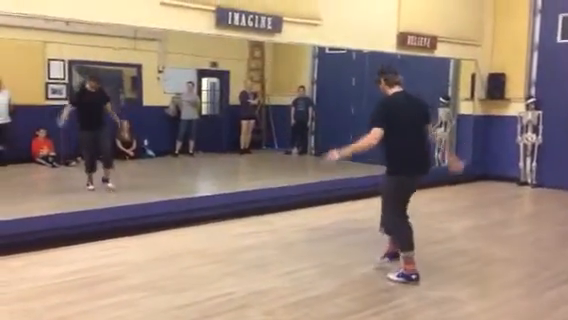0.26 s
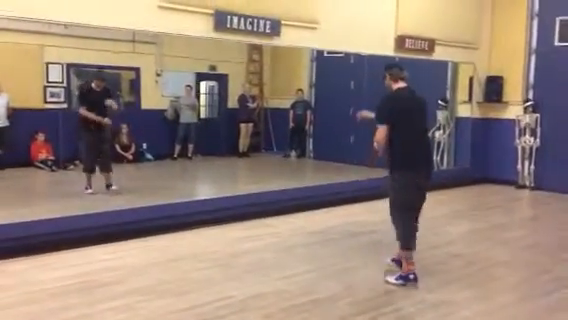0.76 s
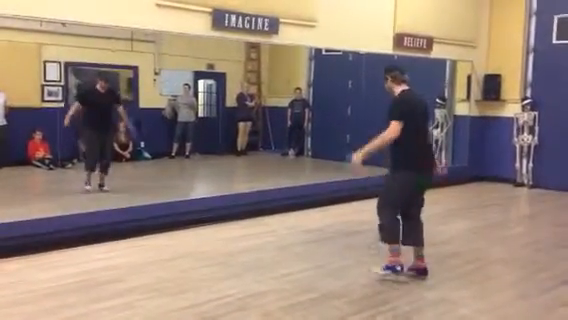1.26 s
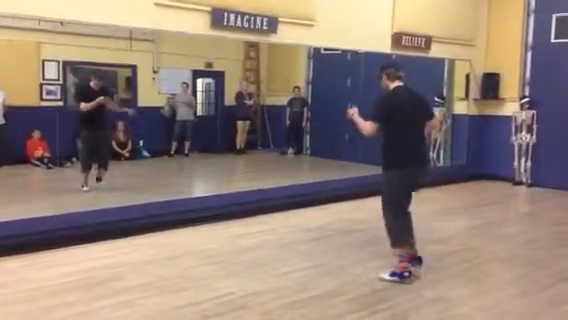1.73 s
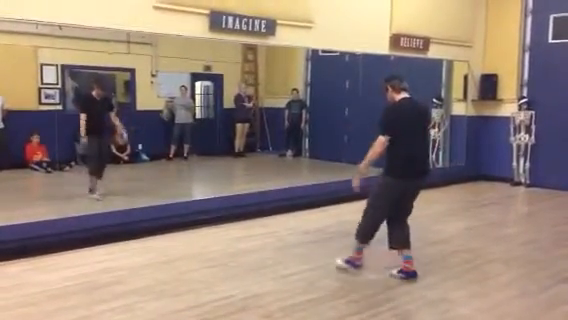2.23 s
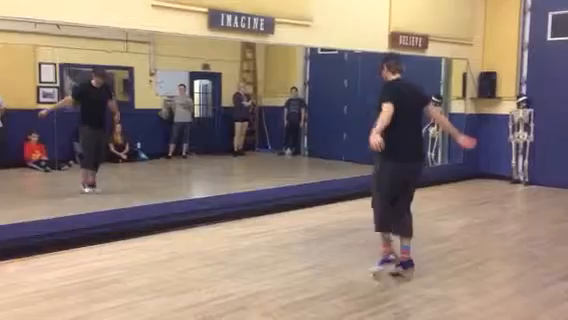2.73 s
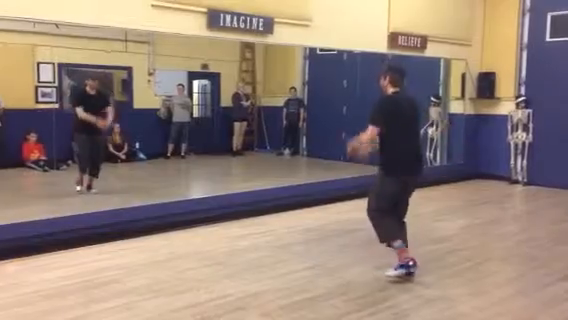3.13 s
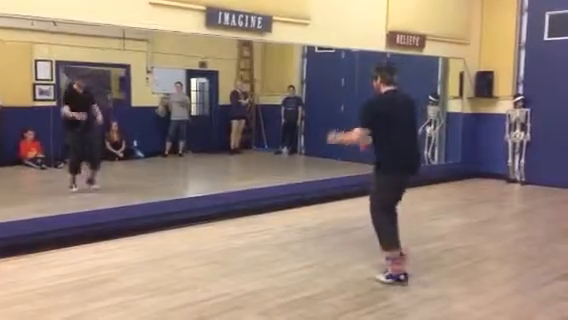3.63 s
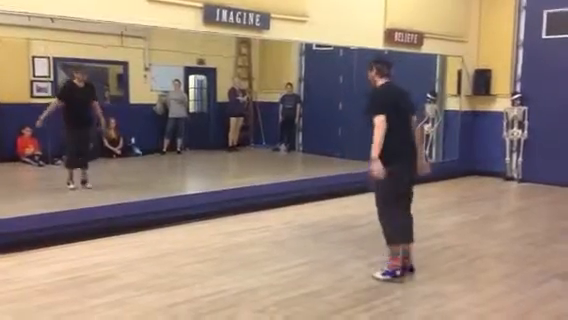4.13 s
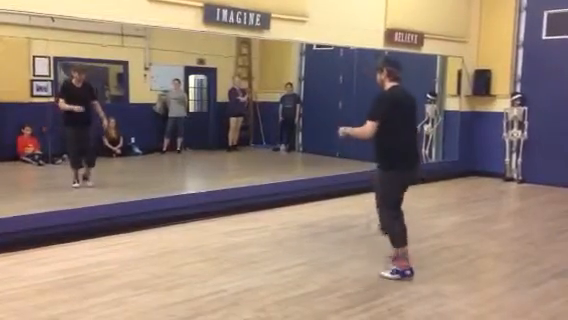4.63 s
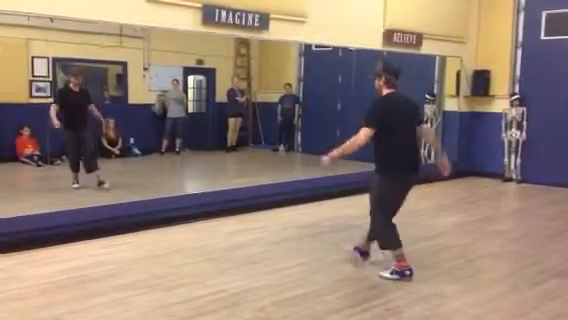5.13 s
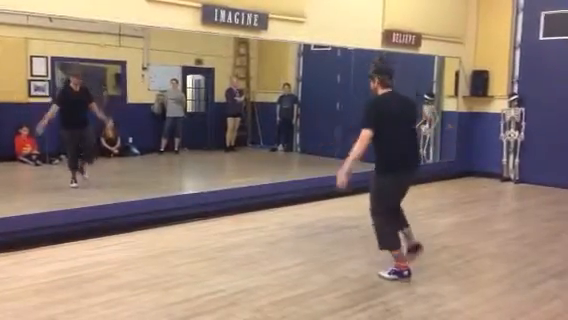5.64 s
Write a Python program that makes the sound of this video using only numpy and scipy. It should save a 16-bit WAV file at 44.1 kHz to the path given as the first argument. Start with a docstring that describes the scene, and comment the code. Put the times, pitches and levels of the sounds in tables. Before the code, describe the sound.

Tap shoes on a sprung wooden floor, heard by one small microphone in a hard-walled hall. The tail of an earlier tap opens, then come a quick pair, spaced loud strikes, a tight little cluster near the middle, and more steady single taps to the end. Sharp early echoes and a diffuse tail follow each blow, over quiet room hiss.

```python
"""Tap dancer in a bare studio

A dancer works through a slow step on a sprung wooden floor in an echoing room, one microphone.
Each blow of a metal plate is a hard click that sets damped sines of plate and boards ringing
for milliseconds; the walls answer with sharp echoes and a tail of filtered noise, each band dying
at its own rate. Under it lies a faint steady hiss of shaped noise."""
import sys
import numpy as np
from scipy import signal
from scipy.fft import rfft, irfft
from scipy.io import wavfile

SR = 44100
rng = np.random.default_rng(int(sys.argv[2]) if len(sys.argv) > 2 else 0)


def store_wav(level_fs):
    """Save 16-bit WAV to argv[1]."""
    pcm = np.round(np.clip(np.atleast_2d(level_fs), -1, 1) * 32767)
    wavfile.write(sys.argv[1], SR, pcm.T.astype(np.int16))


N = 259749
LEAD = SR // 2  # samples kept ahead of the start, for a tap struck earlier
LENGTH = SR  # samples of each tap with its tail
FAVOURED_OCTAVES = 0.21  # width of the pitch region that a blow favours or damps


def from_db(db):
    """Decibels to gain."""
    return 10 ** (np.asarray(db) / 20)


def at_hz(points, hz):
    """Reads an (f/Hz, value) table on a log-frequency axis."""
    table_hz, values = np.transpose(points)
    return np.interp(np.log(hz), np.log(table_hz), values)


def bump(hz, centre_hz, octaves):
    """A bell of height 1 on a log-frequency axis."""
    distance = np.log2(np.maximum(hz, 1) / centre_hz) / octaves
    return np.exp(-.5 * distance ** 2)


def ring(x, hz, t60):
    """Two-pole resonator: a unit click sets a sine of height 1 ringing, down 60 dB after t60 seconds."""
    r = from_db(-60 / (t60 * SR))
    w = 2 * np.pi * hz / SR
    return signal.lfilter([0, np.sin(w)], [1, -2 * r * np.cos(w), r * r], x)


# Spectrum of the hiss in the empty studio: f/Hz, relative level/dB
HISS_SPECTRUM = [(30, 6), (120, 3), (300, 1), (1000, -10), (3000, -5.5), (7000, -14), (12000, -17.5),
                 (15200, -10), (15700, -44.5)]
HISS_DB = -63  # rms ahead of the microphone's filters


def room_hiss():
    """Steady noise of ventilation and microphone: white noise shaped in frequency."""
    hz = np.maximum(np.fft.rfftfreq(N, 1 / SR), 1)
    spectrum = rfft(rng.standard_normal(N)) * from_db(at_hz(HISS_SPECTRUM, hz))
    noise = irfft(spectrum, N)
    return from_db(HISS_DB) * noise / noise.std()


# How long the studio rings: f/Hz, t60/s
REVERB_TIME = [(60, 0.3), (160, 0.72), (420, 0.57), (1100, 0.83), (2900, 0.84), (6000, 0.6), (10000, 0.086),
               (15000, 0.16)]
# Tone of the tail as it sets out: f/Hz, level/dB
TAIL_COLOUR = [(60, -34.5), (150, 0), (400, -5), (1000, -4), (2500, -4.5), (6000, 0), (10000, 0),
               (15000, 5)]
TAIL_RISE_S, DENSE_AFTER_S = 0.014, .1
FIRST_SHARE = .1  # share of samples holding a reflection at first


def room_tails(count):
    """A new response for every tap: scattered reflections thicken into noise that dies band by band."""
    t = np.arange(LENGTH) / SR
    share = np.minimum(FIRST_SHARE + (t / DENSE_AFTER_S) ** 2, 1)
    noise = rng.standard_normal((count, LENGTH))
    present = rng.random((count, LENGTH)) < share
    arrivals = noise * present / np.sqrt(share)  # even power as they thicken
    edges = 40 * 2 ** np.arange(0, 9.1, .5)  # half octaves
    tails = 0
    for low, high in zip(edges, np.minimum(edges[1:], .45 * SR)):
        hz = np.sqrt(low * high)
        band_filter = signal.butter(1, [low, high], "band", fs=SR, output="sos")
        band = signal.sosfilt(band_filter, arrivals + 1e-18)
        level_db = at_hz(TAIL_COLOUR, hz) - 60 * t / at_hz(REVERB_TIME, hz)
        tails = tails + band * from_db(level_db)
    return tails * (1 - np.exp(-(t / TAIL_RISE_S) ** 2))


# Standing waves of the studio, which lift the low tail: f/Hz, level/dB
STANDING_WAVES = [(142, 2.7), (212, 4.3)]
STANDING_OCTAVES = 0.14
TAIL_FAVOUR_SHARE = 0.42  # share of the favoured-pitch dB added again in the tail


def coloured(tails, strength, tail_db, favoured_hz, favour_db):
    """Modes send their sound in different directions, so in the tail their powers add."""
    click = np.arange(LENGTH) == 0
    hz = np.fft.rfftfreq(LENGTH, 1 / SR)
    rings = [ring(click, mode_hz, t60) for mode_hz, t60 in BODY_MODES]
    mode_powers = np.abs(rfft(rings)) ** 2
    blow_spectrum = np.sqrt(strength ** 2 @ mode_powers)
    favoured = bump(hz, favoured_hz[:, None], FAVOURED_OCTAVES)
    lift_db = TAIL_FAVOUR_SHARE * favour_db[:, None] * favoured
    lift_db += sum(db * bump(hz, centre_hz, STANDING_OCTAVES) for centre_hz, db in STANDING_WAVES)
    out = irfft(rfft(tails) * blow_spectrum * from_db(lift_db), LENGTH)
    opening_rms = out[:, :SR // 7].std(axis=1)  # the tail level is set on its first seventh of a second
    return out * (from_db(tail_db) / opening_rms)[:, None]


# How hard each body mode is struck, in the order of BODY_MODES: level in an average blow/dB,
# then the shares [dB per dB] of a tap's weight, knock and brightness that it follows
STRIKE = [(-44.5, 1.7, 0.041, 0.54), (-16, 1.04, 0.16, 0.76), (-16, 0.83, 0, 0), (-12.5, 0, 1.21, 0),
          (-4, 0, 0.73, 0.14), (-5.5, 0.036, 0.71, 0), (0, 0.36, 0.36, 0), (1.5, 0.3, 0.54, 0.027),
          (4.5, 0.6, 0.35, 0.62), (4, 0.23, 0.13, 0.8), (-1.5, 0.41, 0, 2.04)]


def strengths(weight_db, knock_db, favoured_hz, favour_db, bright_db):
    """One row per tap: the gain at which its weight, knock, brightness and favoured pitch drive each mode."""
    average_db, heavy, knocky, bright = np.transpose(STRIKE)
    mode_hz = np.transpose(BODY_MODES)[0]
    near = bump(mode_hz, favoured_hz[:, None], FAVOURED_OCTAVES)
    level_db = average_db + near * favour_db[:, None]
    level_db += heavy * weight_db[:, None]
    level_db += knocky * knock_db[:, None]
    level_db += bright * bright_db[:, None]
    return from_db(level_db)


# What a blow rings with, from floor boom up to plate edge: f/Hz, t60/s
BODY_MODES = [(85, 0.022), (150, 0.022), (270, 0.022), (600, 0.0072), (1250, 0.0043), (1900, 0.0073),
              (2550, 0.0036), (3400, 0.0022), (4600, 0.0011), (6200, 0.0012), (9500, 0.00036)]
CHATTER_DB, CHATTER_S = -18, .0012  # level beside the click, decay time constant
CONTACT_HZ = 11000
SNAP_HZ, SNAP_T60_S = 5000, .0009
SNAP_DB, SNAP_FOLLOWS = -3, 0.83  # gain in an average blow, share of its brightness


def blows(strength, bright_db):
    """One row per tap, peak 1: a click and a short chatter of the loose plate strike every mode."""
    t = np.arange(SR // 10) / SR
    chatter = rng.standard_normal((len(strength), len(t))) * np.exp(-t / CHATTER_S)
    contact = from_db(CHATTER_DB) * chatter + 1e-18
    contact[:, 0] = 1
    # the wood gives a little, so the force has no infinitely sharp edge
    contact = signal.sosfilt(signal.butter(2, CONTACT_HZ, fs=SR, output="sos"), contact)
    modes = 0
    for k, (hz, t60) in enumerate(BODY_MODES):
        modes = modes + (-1) ** k * strength[:, [k]] * ring(contact, hz, t60)  # alternating sign
    modes /= np.abs(modes).max(axis=1, keepdims=True)
    # the instant of metal meeting wood adds a snap of a few cycles
    snap_gain = from_db(SNAP_DB + SNAP_FOLLOWS * bright_db[:, None])
    out = modes - snap_gain * ring(contact, SNAP_HZ, SNAP_T60_S)
    return out / np.abs(out).max(axis=1, keepdims=True)


# Weaker early echoes, at the same delays for every tap: t/ms, peak level above the room tail/dB
WEAK_ECHOES = [(6, 12), (19.3, 5), (21.6, -7.5), (25.4, -18), (35.6, -7), (39.8, 10.5), (52, 6.5)]
ECHO_SPREAD_DB = 2  # standard deviation from tap to tap
BOUNCE_MS = 2.366
FAR_WALL_MS, FAR_WALL_DB = 31.7, -22.5  # level beside the direct click


def early_paths(peak_db, tail_db, bounce_db, near_ms, near_db):
    """One row of impulses per tap: the direct click, its bounce and the sharp echoes off the walls."""
    count = len(peak_db)
    arrivals = [(0, peak_db),
                (BOUNCE_MS, peak_db + bounce_db),
                (near_ms, peak_db + near_db),
                (FAR_WALL_MS, peak_db + FAR_WALL_DB)]
    for ms, db in WEAK_ECHOES:
        spread_db = ECHO_SPREAD_DB * rng.standard_normal(count)
        arrivals.append((ms, tail_db + db + spread_db))
    paths = np.zeros((count, SR // 10))
    for ms, db in arrivals:
        delay = np.round(np.multiply(ms, SR / 1000)).astype(int)
        paths[np.arange(count), delay] += from_db(db)
    return paths


# The taps, the first one struck earlier and still hanging in the room: t/s, direct peak level/dB,
# tail level/dB, plate bounce level re direct/dB, near wall echo t/ms, near wall level re direct/dB,
# weight on the floor/dB, knock of the board/dB, f/Hz near which the blow favours or damps the sound,
# level of that favour/dB, brightness/dB
TAPS = [(-0.3, -8.0, -31, -6, 11.5, -6, 19, 24, 4040, 2, -1),
        (0.088, -4.5, -28, -5, 10.5, -5, 5.5, 2.5, 2940, 6.5, 5),
        (0.3061, -14.0, -37, -7, 12.3, -1.5, -1, 11, 4800, -5, -3.5),
        (0.9764, -2, -24, -12.5, 11.6, -6.5, 7.7, 2.5, 3700, 6.5, 3),
        (1.63, -4, -23.5, -11, 12.5, -12, 15, 10, 3230, 2, 4.5),
        (2.0157, -6.5, -28, -1.5, 12.7, -2, -8, 2, 2600, 2.5, 5.5),
        (2.2571, -12.7, -36, -6.5, 12.2, -9, -5.5, 0, 2360, 1.5, -8.5),
        (2.6828, -8, -31, -4.5, 9.6, -10, -6, 0.1, 3800, -5.5, 1),
        (2.7173, -9.5, -35, -11, 11, -14, 3, -8, 6070, 13, -7),
        (2.7218, -9.5, -39.5, -2, 9.5, -4, 2, -12, 5940, 17, -7),
        (2.9019, -9, -36.5, -3, 11.7, -7.5, -5.5, -4, 3700, -8, -3),
        (3.549, -45, -58, -9, 9, -15, 21, 23, 2570, -5, -3.5),
        (3.5803, -5, -28, -4.5, 12.2, -7, -8.5, 9.5, 2800, 5, 4.5),
        (4.2286, -7, -26.5, -14, 12.2, -4, 13.5, 7, 2340, -9, 1.5),
        (4.241, -6, -30, -5.5, 13, -16, -0.5, -8, 2380, -27, 0.5),
        (4.6635, -5, -26, -2.5, 10.6, -8, -7.5, -5, 4540, 5, 0.8),
        (4.9328, -7.5, -31, -3.5, 9.4, -4.5, -1.3, 1.5, 2540, 5, -0.3),
        (5.3514, -0.5, -28, -10, 9.2, -10, 10, 0, 2360, 12.5, 2),
        (5.6083, -9.5, -31.5, -9.5, 12.1, -1.5, 6, 6.5, 2800, 2.5, -2.5)]


def dancer():
    """Every blow is heard directly, off the walls and through the room tail."""
    (start_s, peak_db, tail_db, bounce_db, near_ms, near_db,
     weight_db, knock_db, favoured_hz, favour_db, bright_db) = np.transpose(TAPS)
    strength = strengths(weight_db, knock_db, favoured_hz, favour_db, bright_db)
    heard = coloured(room_tails(len(TAPS)), strength, tail_db, favoured_hz, favour_db)
    paths = early_paths(peak_db, tail_db, bounce_db, near_ms, near_db)
    sharp = signal.fftconvolve(blows(strength, bright_db), paths, axes=1)
    heard[:, :sharp.shape[1]] += sharp
    out = np.zeros(LEAD + N + LENGTH)
    for s, tap in zip(start_s, heard):
        at = LEAD + round(s * SR)
        out[at:at + LENGTH] += tap
    return out[LEAD:LEAD + N]


def scene():
    """Dancer and room, one microphone."""
    return (dancer() + room_hiss())[None]


MIC_LOW_HZ, MIC_HIGH_HZ = 52, 11700
CUTOFF_HZ = 16500  # 70 dB down from here up


def record(dry):
    """The small microphone loses the deep bass and the highest treble; the top is cut."""
    mic = signal.butter(2, [MIC_LOW_HZ, MIC_HIGH_HZ], "band", fs=SR, output="sos")
    top_cut = signal.cheby2(12, 70, CUTOFF_HZ, fs=SR, output="sos")
    return signal.sosfilt(top_cut, signal.sosfilt(mic, dry))


dry = scene()
out = record(dry)
store_wav(out)
```